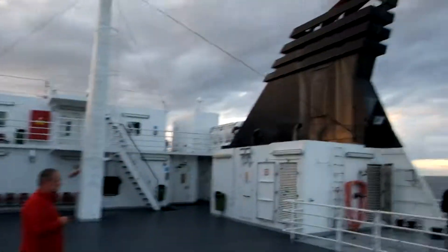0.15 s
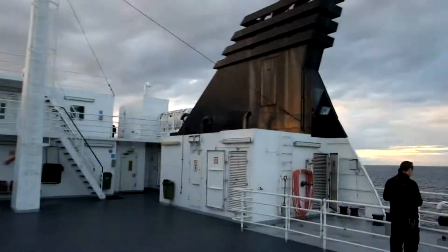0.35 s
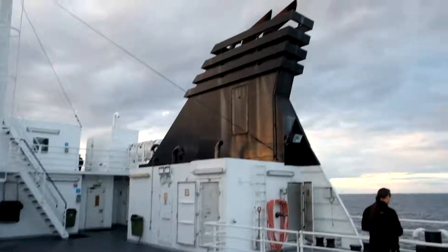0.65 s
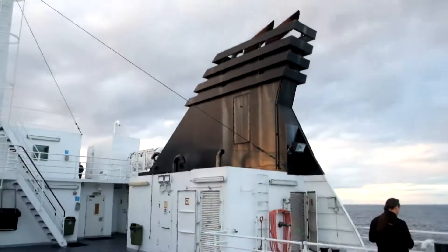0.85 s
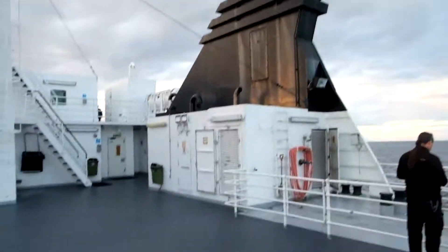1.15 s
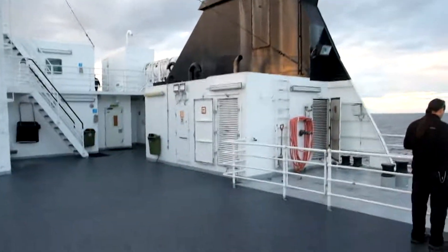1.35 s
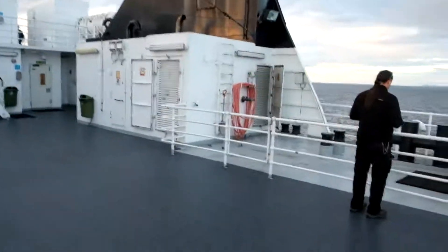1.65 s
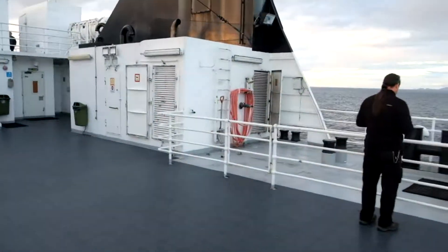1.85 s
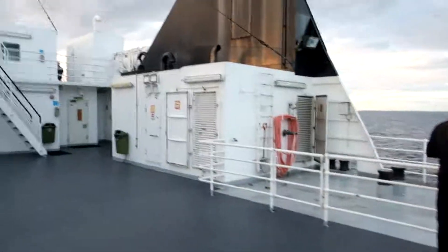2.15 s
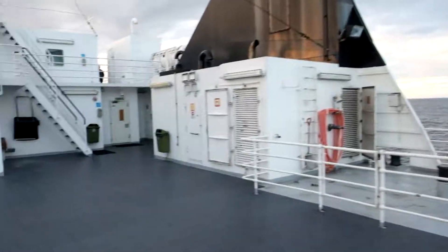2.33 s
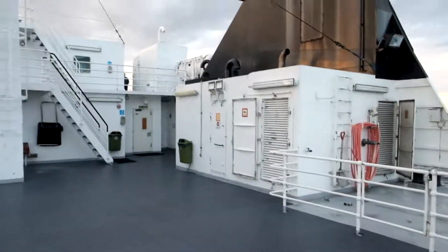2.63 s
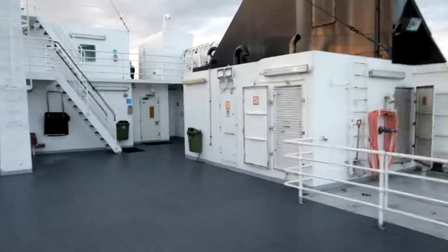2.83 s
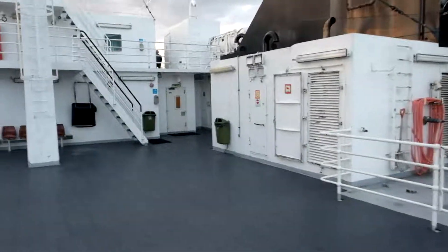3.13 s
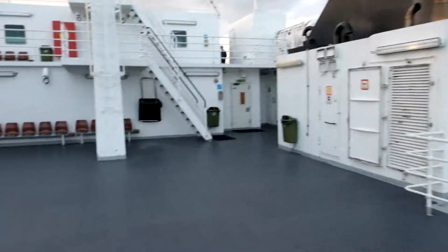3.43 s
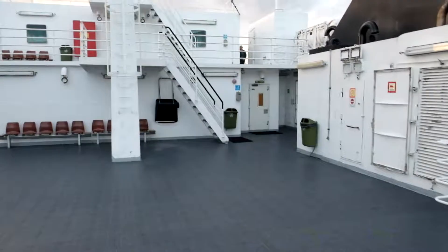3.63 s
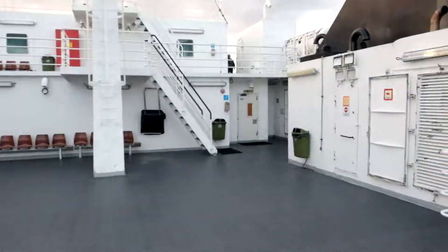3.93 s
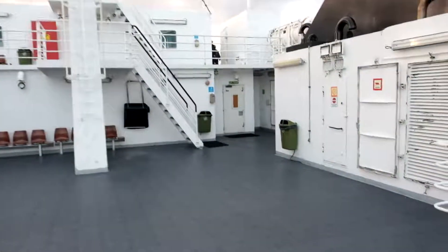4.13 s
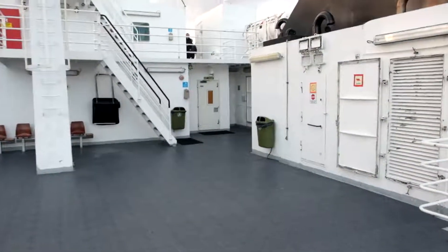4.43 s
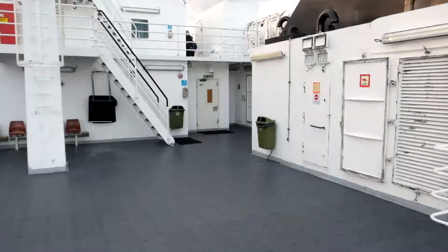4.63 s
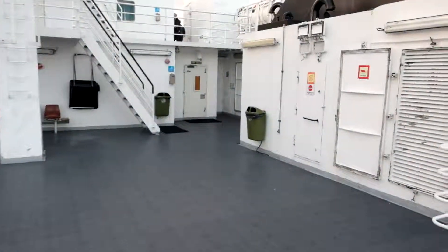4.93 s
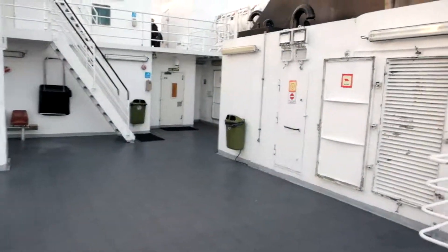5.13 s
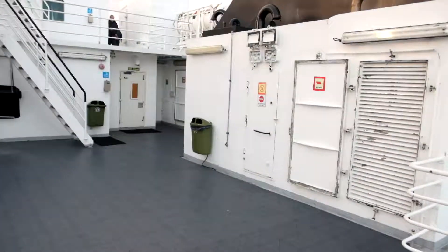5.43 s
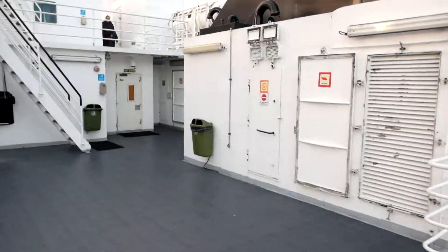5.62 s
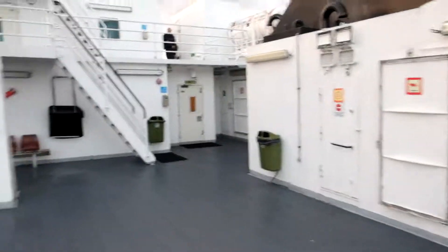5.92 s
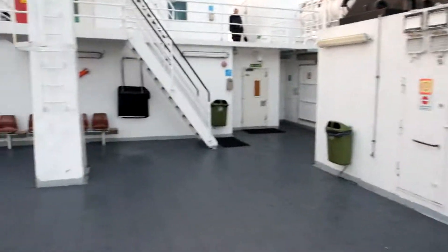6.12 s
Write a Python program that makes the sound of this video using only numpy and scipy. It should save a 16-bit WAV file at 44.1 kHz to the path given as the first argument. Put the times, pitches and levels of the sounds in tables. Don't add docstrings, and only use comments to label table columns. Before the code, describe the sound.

An open ship's deck, heard through a handheld stereo microphone for about 6.3 seconds. A low diesel drone, strongest around 80 to 180 Hz, runs throughout, its harmonics beating irregularly as engines slip in and out of step. Over it lies a wide, duct-coloured roar of vents with soft wake hiss and very faint, wavering high whistles. Dry housing ticks cluster in the first 0.25 seconds. At 0.65 wind thumps the left side, with a brief thin moan until 0.8. The drone swells near 1.1; a small metal fitting jingles lightly left from 1.25 to 1.4. Rough wind buffets batter the right side from 2.2 to 2.75, again near 3.2, and more softly around 3.8. A lone tick comes at 4.0. The drone swells most at 4.5. Small buffets return near 5.4, and a tiny jingle at 6.0; roar continues to the cut.

```python
import sys
import numpy as np
from scipy import signal
from scipy.io import wavfile
from scipy.ndimage import uniform_filter1d, map_coordinates

SR = 44100
rng = np.random.default_rng(int(sys.argv[2]) if len(sys.argv) > 2 else 0)


def int16_out(signal):
    q = np.round(np.clip(np.atleast_2d(signal).T, -1, 1) * 32767)
    wavfile.write(sys.argv[1], SR, q.astype(np.int16))


def volts_from_decibels(level):
    exponent = np.asarray(level, float) / 20
    return 10 ** exponent


N = 276626
LAG = 4 / SR


def evened(x):
    return x / np.sqrt(np.mean(x ** 2) + 1e-20)


def read(points, hz):
    f, value = np.transpose(points)
    return np.interp(np.log(hz + 1), np.log(f + 1), value)


def add(mix, s, sound):
    part = mix[..., max(round(s * SR), 0):][..., :sound.shape[-1]]
    part += sound[..., :part.shape[-1]]


def drift(t, top_hz):
    waves = [np.sin(2 * np.pi * (f * t + rng.random())) / np.sqrt(f)
             for f in np.geomspace(top_hz / 20, top_hz, 20)]
    return evened(sum(waves))


def panned(x, lean_db):
    return x * volts_from_decibels(np.multiply.outer([.5, -.5], lean_db * np.ones(x.shape[-1])))


def swells(t, rows):
    return sum(volts_from_decibels(db) * np.exp(-((t - s) / half) ** 2) for s, db, half in rows)


def roar():
    # frequency in Hz, density in dB per Hz.
    spectrum = [(15, -31), (40, -19), (90, -13.5), (200, -10.5), (300, -12.5), (370, -20), (800, -27.5),
                (1050, -32.5), (1700, -36.5), (3400, -41.5), (4300, -43.5), (6200, -46.5), (9000, -60),
                (15500, -77)]
    # frequency in Hz, width in Hz, first dB, last dB.
    ducts = [(426, 45, 7.5, 2), (590, 80, 4, -3), (710, 40, 4.5, -1), (836, 93, 8, 7.5), (1123, 130, -4, 9),
             (1450, 41, 4.5, 7), (1980, 73, 2.5, 2), (3450, 300, 3, 2), (4660, 280, 2.5, 7),
             (9250, 220, 5, 5.5)]
    # time in seconds, level in dB.
    facing = [(0, -2.5), (.17, -0.5), (.4, -1), (.75, 1), (1.12, -1), (1.36, 1.5), (1.7, 1), (2.15, 0),
              (2.48, 0.5), (2.8, 0), (3.3, 0), (3.7, -.5), (3.98, 1), (4.28, -1.5), (4.85, -.5), (5.06, 2),
              (5.35, -1), (6.27, 0.5)]
    facing_hz = [600, 1900, 5000, 10000]
    facing_share = [0.64, 1.04, 0.74, 1.1]
    walk_db = [-6, -.3, -.4, 6]
    # frequency in Hz, left-right correlation.
    likeness = [(25, .3), (60, 0.39), (130, 1), (400, 0.83), (800, 0.94), (1500, 0.26), (4000, 0.11),
                (8000, .2), (13000, 0.66)]
    # frequency in Hz, left over right in dB.
    balance = [(60, -3.5), (110, 7.5), (200, -2), (380, 2.0), (700, 0), (1290, -0.5), (2380, 1.5),
               (4400, -1), (8120, 2), (15000, 2.5)]
    # start in seconds, level in dB, fading in seconds.
    spray = [
        (1.0, 1, 0.084),
        (1.28, 3.5, 0.19),
        (1.5, 2, .15),
        (3.3, 1, 0.18),
        (3.55, 4.5, 0.072),
        (3.97, 0.5, 0.18),
        (4.89, 3.5, 0.12),
        (5.6, 3, 0.046),
        (5.95, 2, 0.096),
    ]

    frames, hz = N // 256 + 5, np.fft.rfftfreq(1024, 1 / SR)
    t = np.arange(frames) * 256 / SR
    a, b, c, d, patches = rng.standard_normal((frames, 513, 5)).T
    patches = uniform_filter1d(patches, size=14, axis=0)
    patches = evened(uniform_filter1d(patches, size=10, axis=1))

    turn_db = np.outer(facing_share, np.interp(t, *np.transpose(facing)))
    turn_db += np.outer(walk_db, t / t[-1] - .5)
    turn_db = np.vstack([0 * t, turn_db])
    place = np.interp(np.log(hz + 1), np.log([300] + facing_hz), np.arange(5))
    turn_db = map_coordinates(turn_db, np.meshgrid(place, np.arange(frames), indexing="ij"), order=1)

    colour_db = read(spectrum, hz)[:, None]
    for f, width, first, last in ducts:
        resonance = 1 / (1 + (2 * (hz - f) / width) ** 2)
        colour_db = colour_db + np.outer(resonance, np.linspace(first, last, frames))

    gusts = evened(uniform_filter1d(rng.standard_normal(frames), size=5))
    bursts_db = sum(db * (t > s) * np.exp(-abs(t - s) / fading) for s, db, fading in spray)
    flicker_db = (.9 * gusts + bursts_db) * np.clip(hz / 4000, 0, 1)[:, None]

    same = np.clip(read(likeness, hz), -1, 1)[:, None]
    left = a + 1j * b
    right = same * left + np.sqrt(1 - same ** 2) * (c + 1j * d)
    z = np.array([left, right])
    z[0] *= np.exp(-2j * np.pi * hz * LAG)[:, None]
    z *= volts_from_decibels(np.multiply.outer([.5, -.5], read(balance, hz)))[..., None]
    z *= volts_from_decibels(colour_db + turn_db + 0.53 * patches + flicker_db)
    air = signal.istft(z, nperseg=1024, noverlap=768)[1][:, :N]
    return volts_from_decibels(-30) * evened(air)


def whistles():
    # start in seconds, end in seconds, pitch in Hz, level in dB.
    tones = [(.2, 2.6, 4468, -65), (2.7, 4.3, 4466, -65), (4.7, 5.9, 4470, -67), (1.85, 2.6, 4550, -62),
             (3.2, 3.8, 4552, -67), (4.7, 6.1, 4560, -66), (0, 1.4, 4625, -66), (3.2, 4.2, 4615, -65),
             (5.4, 6.2, 4610, -64), (.9, 2.7, 4683, -64), (4.6, 5.3, 4665, -64), (.1, .95, 4752, -65),
             (1.4, 3.1, 4768, -67), (4.8, 6.2, 4755, -66), (2, 2.7, 4715, -67), (3.3, 4.2, 4700, -68),
             (0, 6.27, 9506, -87)]
    # time in seconds, pitch in Hz, level in dB.
    moan = [(.58, 1050, -58), (.61, 1060, -49), (.665, 1070, -60), (.7, 1100, -49), (.76, 1120, -48),
            (.81, 1120, -62)]
    out = np.zeros((2, N))
    for t0, t1, hz, db in tones:
        t = np.arange(0, t1 - t0, 1 / SR)
        waver_hz = 2.5 * drift(t[::64], 6).repeat(64)[:len(t)]
        turns = np.cumsum(hz + waver_hz) / SR
        flutter = np.array([np.interp(t, t[::64], drift(t[::64], 40)) for port in out])
        level = volts_from_decibels(7.5 + db + 2.5 * flutter) * signal.windows.tukey(len(t), .3)
        add(out, t0, level * np.sin(2 * np.pi * turns + np.array([[0], [2.4]])))
    s, hz, db = np.transpose(moan)
    t = np.arange(s[0], s[-1], 1 / SR)
    turns = np.cumsum(np.interp(t, s, hz)) / SR
    add(out, s[0], np.sqrt(2) * volts_from_decibels(np.interp(t, s, db)) * np.sin(2 * np.pi * turns))
    return out


def handling():
    # start in seconds, level in dB, pitch in Hz.
    ticks = [
        (.061, -52, 8800),
        (.078, -44, 8550),
        (.081, -45, 8600),
        (.126, -58, 8000),
        (.142, -60, 8000),
        (.199, -50, 8400),
        (.217, -62, 11000),
        (.221, -54, 10600),
        (3.972, -56, 9000),
    ]
    # frequency in Hz, level in dB, 60 dB decay time in seconds.
    modes = [(5238, 0, .15), (6842, 1, .25), (8893, -14, .1), (12010, -14, .1), (13030, -2, .14),
             (13560, -9, .12), (14120, -18, .1), (14460, -12, .1)]
    # start in seconds, level in dB, brightness 0 to 1.
    jingles = [(0, -70, .05), (.286, -67, .08), (.32, -68, .08), (.667, -76, .9), (.694, -70, .9),
               (1.258, -73, .7), (1.2845, -61, .8), (1.309, -58, .8), (1.338, -59, .4), (1.369, -59.5, .8),
               (1.4, -66, .4), (1.516, -68, .05), (4.889, -76, .8), (6.002, -69, .9)]
    out, t = np.zeros(N), np.arange(SR // 4) / SR
    for s, db, hz in ticks:
        snap = rng.standard_normal(200) * np.exp(-t[:200] / 0.0008)
        band = signal.butter(1, [1.0 * hz, 1.1 * hz], "bandpass", fs=SR, output="sos")
        snap = signal.sosfilt(band, snap)
        add(out, s, volts_from_decibels(db) * snap / abs(snap).max())
    for s, db, bright in jingles:
        bright = np.clip(bright, 0, 1)
        for hz, mode_db, t60 in modes:
            share = (bright if hz > 10000 else 1 - bright) * rng.uniform(.75, 1.25)
            ring = np.sin(2 * np.pi * (hz * t + rng.random())) * np.minimum(t / .002, 1)
            add(out, s, share * volts_from_decibels(db + mode_db - 60 * t / t60) * ring)
        click = rng.standard_normal(120) * np.exp(-t[:120] / .0008)
        add(out, s, bright * volts_from_decibels(db + 3) * click)
    muffled = signal.sosfilt(signal.butter(3, 13500, fs=SR, output="sos"), out)
    return panned(muffled, 6.2) * 1.9


def buffet(db, hz):
    t = np.arange(-.04, .05, 1 / SR)
    fade = np.exp(-(t / np.where(t < 0, .008, .015)) ** 2)
    lumps = rng.standard_normal(len(t)) * (rng.random(len(t)) < .03) * fade
    lumps[round(.04 * SR)] = 4 * rng.choice([-1, 1])
    band = signal.butter(2, [0.28 * hz, 1.31 * hz], "bandpass", fs=SR, output="sos")
    swing = signal.sosfilt(band, lumps)
    swing = signal.sosfilt(signal.butter(3, 2000, fs=SR, output="sos"), swing)
    return volts_from_decibels(db + 8.5) * swing / abs(swing).max()


def wind():
    # time in seconds, level in dB, pitch in Hz.
    left_buffets = [(0.087, -28.5, 400), (.629, -23.5, 470), (.648, -26.5, 400), (0.671, -28, 400),
                    (1.548, -32, 600), (1.767, -29, 590), (2.641, -34, 500), (3.215, -25.5, 705),
                    (5.292, -32.5, 450), (5.338, -34, 450), (5.439, -34, 460)]
    # time in seconds, level in dB, pitch in Hz.
    right_buffets = [(1.223, -30, 580), (1.955, -30, 700), (1.979, -29, 900), (2.174, -21, 520),
                     (2.242, -33, 606), (2.337, -19, 390), (2.382, -26.5, 820), (2.457, -19, 404),
                     (2.487, -21.5, 466), (2.501, -25.5, 890), (2.539, -23, 640), (2.567, -21.5, 570),
                     (2.599, -22, 617), (2.651, -23, 440), (2.708, -22, 555.6), (2.718, -19.5, 700),
                     (2.735, -30, 900), (3.166, -23, 433), (3.215, -20.5, 560), (3.228, -29.5, 1100),
                     (3.289, -29, 400), (3.751, -33, 480), (3.798, -28.5, 830), (3.843, -28, 540),
                     (3.89, -27, 494), (5.1, -36, 900), (5.427, -31.5, 534), (5.459, -25.5, 790)]
    # start in seconds, end in seconds, level in dB.
    gusts = [
        (1.197, 1.26, -34),
        (2.18, 2.31, -32),
        (2.36, 2.5, -33.5),
        (2.511, 2.63, -25.5),
        (2.64, 2.7, -29),
        (3.129, 3.2, -34),
        (3.198, 3.29, -28),
        (3.7, 3.88, -35.5),
    ]
    eddy_hz = (420, 940)
    eddy_gap_s, eddy_spread_db = .018, 2
    out, eddies = np.zeros((2, N)), []
    for t0, t1, db in gusts:
        s = np.arange(0, .3, eddy_gap_s)
        late, size, pitch = rng.random((len(s), 3)).T
        times = t0 + s + late * eddy_gap_s
        levels = db + eddy_spread_db * (2 * size - 1)
        rows = zip(times, levels, np.interp(pitch, [0, 1], eddy_hz))
        eddies += [row for row in rows if row[0] < t1]
    for port, rows in zip(out, (left_buffets, right_buffets + eddies)):
        for s, db, hz in rows:
            add(port, s - .041, buffet(db, hz))
    return out


def engines():
    # cycle rate in Hz, level in dB.
    diesels = [(13.605, 0.5), (13.645, -1.5), (13.715, -2), (13.75, -0.5)]
    # multiple of the cycle rate, level in dB.
    exhaust = [(1, -31.5), (2, -26.5), (3, -12), (4, -25.5), (5, -14), (6, -8), (7, -12), (8, 0), (9, -14),
               (10, -10), (11, -8), (12, -14.5), (13, -2), (14, -11), (15, -16.5), (16, -11.5), (17, -12),
               (18, -13.5), (19, -17), (20, -9), (21, -11), (22, -12.5), (23, -20.5), (24, -25.5)]
    beating = [3, 6, 8, 13]
    apart = [0.075, 0.066, 0.012, 0.037]
    # time in seconds, level in dB, half length in seconds.
    in_step_3 = [(-.15, -35, 0.5), (1.58, -35.5, 0.7), (3.77, -37.5, .7), (5.8, -38, 0.82)]
    # time in seconds, level in dB, half length in seconds.
    in_step_6 = [(0.19, -41.3, 0.17), (1.75, -42.5, 0.8), (2.75, -33.7, 0.81), (3.7, -35.5, 0.41),
                 (4.68, -36, 0.35), (5.34, -33.5, 0.31), (5.95, -41.5, 0.7)]
    # time in seconds, level in dB, half length in seconds.
    in_step_8 = [(0.58, -32.5, 0.48), (1.09, -25.1, 0.33), (2.05, -28.0, 0.36), (3.09, -27.5, 0.35),
                 (3.62, -34, 0.2), (4.5, -22.5, 0.45), (5.35, -29, 0.27), (6.15, -26, 0.5)]
    # time in seconds, level in dB, half length in seconds.
    in_step_13 = [(0.34, -25.5, 0.55), (1.6, -30, 0.39), (2.31, -26, 0.2), (2.9, -26, 0.24),
                  (3.36, -32, 0.1), (3.97, -26.7, 0.38), (4.83, -30.5, 0.31), (5.75, -39.5, 0.74)]
    # time in seconds, level in dB, half length in seconds.
    in_step_upper = [(.2, 4.5, 0.2), (.7, 5.5, 0.29), (1.3, 0, .3), (1.8, 2, .3), (2.4, -1, .25),
                     (2.95, 1.5, 0.21), (3.35, 2, .2), (3.8, -5, .25), (4.208, 1, .15), (4.6, -1, .25),
                     (5.05, 1, 0.13), (5.5, -1.5, .25), (5.85, -2, .2), (6.15, -0.5, 0.23)]

    count = len(diesels)
    t = np.arange(0, N + 32, 16) / SR
    turns = [np.cumsum(hz * (1 + 0.0012 * drift(t, 1.564))) * 16 / SR for hz, db in diesels]
    together = np.cumsum(13.67 * (1 + 0.0021 * drift(t, 1.195))) * 16 / SR
    beats = [swells(t, rows) for rows in (in_step_3, in_step_6, in_step_8, in_step_13)]
    upper = swells(t, in_step_upper) * volts_from_decibels(2.5 * drift(t, 14))
    uneven = [np.interp(t, t[::16], volts_from_decibels(2.0 * drift(t[::16], 30))) for engine in diesels]
    out = np.zeros((2, len(t)))
    left = np.array([[1], [0]])
    for k, db in exhaust:
        start = rng.random(count + 1)
        spread = 0.048 * rng.standard_normal(count + 1) - k * diesels[1][0] * LAG
        if k in beating:
            i = beating.index(k)
            level = beats[i] * uneven[k % count] ** 0.32
            phase = k * together + start[-1] - left * apart[i]
            out += np.sqrt(2) * level * np.sin(2 * np.pi * phase)
        else:
            swell = upper if k > beating[-1] + 1 else 1
            for turn, phase, shift, rough, (hz, share_db) in zip(turns, start, spread, uneven, diesels):
                level = volts_from_decibels(-30.5 + db + share_db) * swell
                out += level * rough * np.sin(2 * np.pi * (k * turn + phase + left * shift))
    out = signal.resample_poly(out, up=16, down=1, axis=1, padtype="line")[:, :N]
    return panned(out, 2)


def scene():
    return roar() + whistles() + handling() + wind() + engines()


def top_cut(x):
    return signal.sosfilt(signal.butter(12, 15710, fs=SR, output="sos"), x)


def record(dry):
    return top_cut(dry)


dry = scene()
out = record(dry)
int16_out(out)
```